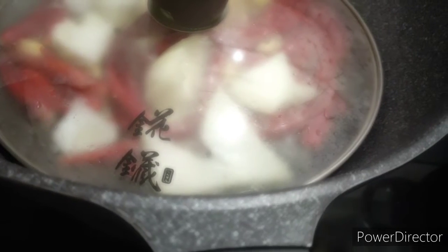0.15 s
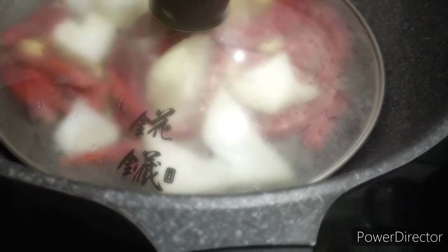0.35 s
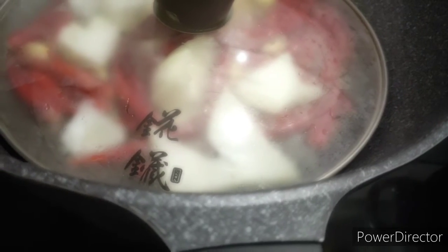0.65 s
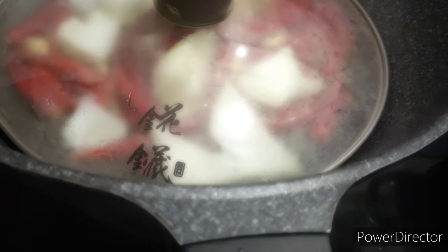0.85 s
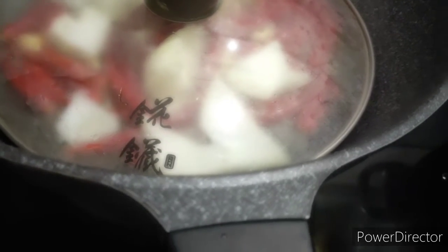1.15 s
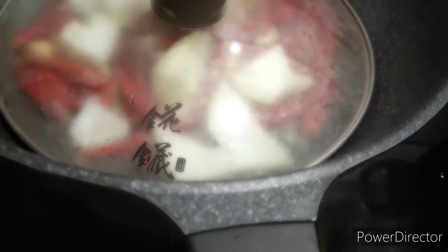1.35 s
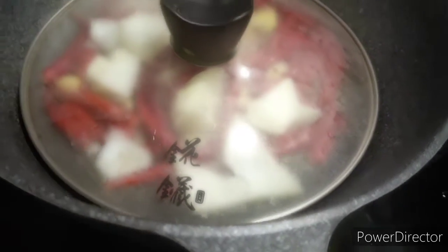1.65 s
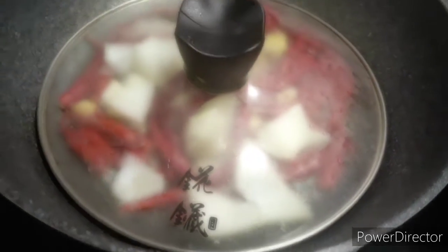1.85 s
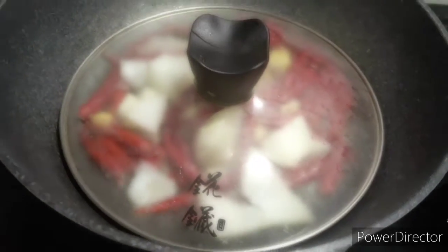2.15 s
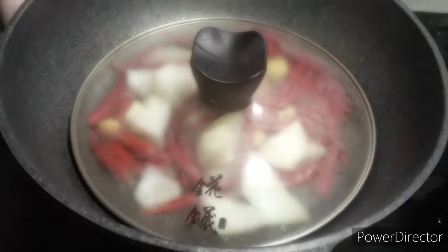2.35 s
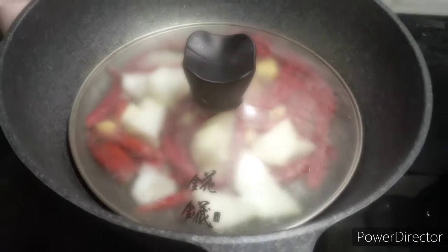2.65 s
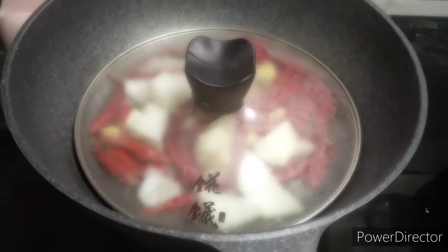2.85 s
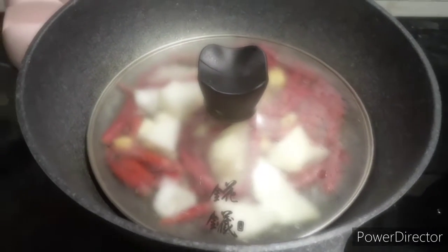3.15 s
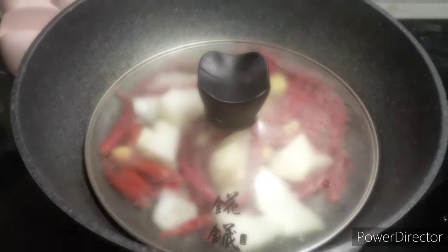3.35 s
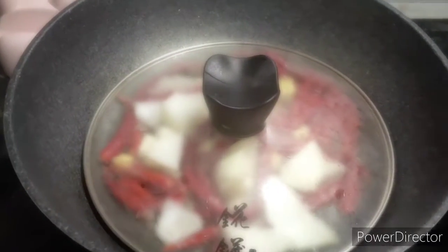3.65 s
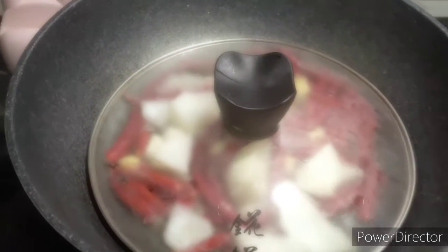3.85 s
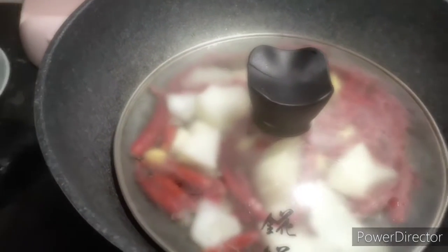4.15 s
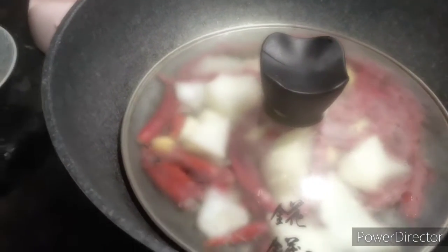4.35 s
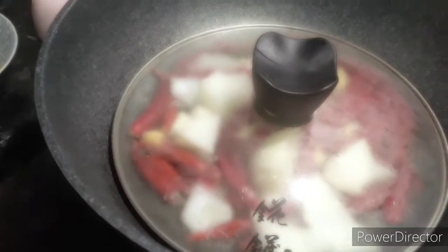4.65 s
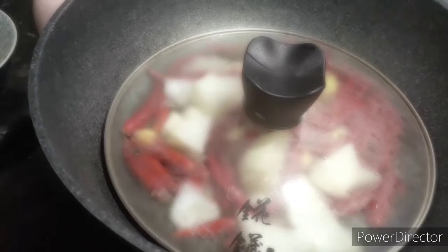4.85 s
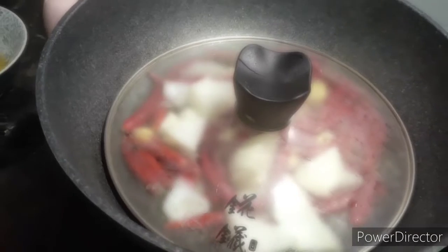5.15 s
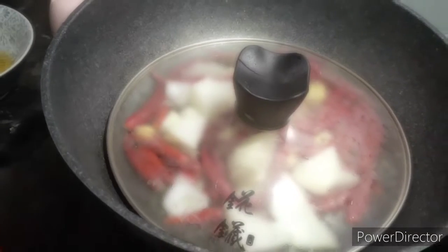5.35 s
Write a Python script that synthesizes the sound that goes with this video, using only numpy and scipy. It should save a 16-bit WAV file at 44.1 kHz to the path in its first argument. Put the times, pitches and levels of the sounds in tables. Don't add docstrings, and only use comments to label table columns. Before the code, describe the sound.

Chilies and onion fry under a glass lid in a deep pan, heard very close. Dense bubbling and airy hiss run throughout, with hollow pops and sharp spits scattered irregularly. At about 0.1 seconds a droplet thumps the right microphone and the sound dips briefly; softer knocks follow near 0.5 and 1.9 seconds. A fan hums faintly beneath.

```python
import sys
import numpy as np
from scipy import signal
from scipy.fft import rfft, irfft
from scipy.io import wavfile
from scipy.ndimage import uniform_filter1d

SR = 44100
rng = np.random.default_rng(int(sys.argv[2]) if len(sys.argv) > 2 else 0)


def dump_mix(stems):
    frames = np.atleast_2d(stems).T
    limited = np.clip(frames, -1, 1)
    pcm = np.round(limited * 32767).astype(np.int16)
    wavfile.write(sys.argv[1], SR, pcm)


def volts_from_decibels(level):
    exponent = np.asarray(level, float) / 20
    return 10 ** exponent


N = 242858
SIZE = 4096
TOP_HZ = 15780

# (time [s], peak level [dB], push time constant [s], wobble level [dB])
DROPS = [
    (0.1147, -6, 0.00092, -33),
    (0.485, -26.5, 0.0016, -44.5),
    (.639, -33.5, 0.0017, -49),
    (1.899, -20, 0.0011, -40),
]
# (frequency [Hz], width [Hz], level [dB])
BOWL = [
    [(385, 170, -47), (438.4, 236, 6), (540, 240, -0.5), (446, 25, 3)],
    [(992, 109, 12), (1133, 99, 3.5), (1236, 81, -2.5), (1085, 170, -6), (958, 45, 6.5)],
    [(1553, 263, 6.5), (1915, 128, 1.5), (2137, 204, 3), (2820, 220, -4.5), (3243, 150, -9)],
]
LIKENESS = 0.84, 0.48, 0.2


def curve(table, column):
    rows = np.array(table)
    return np.interp(np.arange(N) / SR, rows[:, 0], rows[:, column])


def shape(points, size):
    hz, db = np.transpose(points)
    return np.interp(np.log(np.fft.rfftfreq(size, 1 / SR) + 1), np.log(hz), db)


def modes(table, size):
    f = np.fft.rfftfreq(size, 1 / SR) + 1e-3
    return sum(volts_from_decibels(db) / (1 + 1j * hz / width * (f / hz - hz / f)) for hz, width, db in table)


def through(x, response, size):
    return irfft(rfft(x, size) * response, size)


def unit(x):
    return x / np.sqrt(np.mean(x ** 2))


def above(hz, size):
    return 1 / (1 + (hz / (np.fft.rfftfreq(size, 1 / SR) + 1)) ** 12)


def pair(shape_of, likeness):
    mid, side = rng.standard_normal(shape_of + (2,)).T
    c = np.clip(likeness, 0, 1)
    common = np.sqrt(1 + c) * mid
    opposed = np.sqrt(1 - c) * side
    return np.array([common + opposed, common - opposed])


def grains(rate, spread_db, smear_s):
    loudness_db = spread_db * np.minimum(rng.exponential(size=N), 3.5)
    hits = (rng.random(N) < rate / SR) * volts_from_decibels(2 * loudness_db)
    power = signal.lfilter([1], [1, -np.exp(-1 / (smear_s * SR))], hits)
    return np.sqrt(power + 1e-9)


def columns(table, **shared):
    return np.vstack([np.transpose(table)] + [np.full(len(table), v) for v in shared.values()])


def place(sounds, times, db, pan_db):
    out = np.zeros((2, N + SIZE))
    peak = np.abs(sounds).max(axis=2) + 1e-12
    for k, s in enumerate(times):
        i = max(int(s * SR), 0)
        gain = volts_from_decibels(db[k] + np.array([pan_db[k], -pan_db[k]]) / 2) / peak[:, k]
        out[:, i:i + SIZE] += sounds[:, k] * gain[:, None]
    return out[:, :N]


def bowl(table, size, struck=False):
    f = np.fft.rfftfreq(size, 1 / SR)
    ring = 0
    for k, (hz, width, db) in enumerate(table):
        if struck:
            mode = modes([(hz, 0.61 * width, 0)], size)
        else:
            mode = modes([(hz, width, 0)], size) ** 2
        ring = ring + (-1) ** k * volts_from_decibels(db) * mode
    bass_cut = signal.butter(2 if struck else 4, 316, "high", fs=SR, output="sos")
    return ring * signal.sosfreqz(bass_cut, f, fs=SR)[1]


def rim(size):
    # (frequency [Hz], level [dB per Hz])
    hiss = [(1530, 19), (2600, -2), (2790, 0), (2990, -1), (3300, 0.5), (4100, -5.5), (4390, -4), (5790, 0),
            (7420, 3), (9640, -8.5), (14800, -20), (15700, -9), (16400, -71)]
    # (frequency [Hz], level [dB])
    port_tilt = [(2500, -2.5), (4400, 1.5), (8100, -2.5), (15000, -19.5)]
    echo_gain, echo_s, echo_top_hz = 0.31, .001825, 8000
    f = np.fft.rfftfreq(size, 1 / SR)
    tilt = shape(port_tilt, size) / 2
    echo = echo_gain / (1 + (f / echo_top_hz) ** 6) * np.exp(-2j * np.pi * f * echo_s)
    return volts_from_decibels(shape(hiss, size) + np.array([tilt, -tilt])) / (1 - echo)


def kitchen():
    # (frequency [Hz], level [dB per Hz])
    rumble_shape = [(12, -35), (20, 8), (59, -3), (114, 6), (144, -11), (173, -45), (217, -42), (260, -65),
                    (340, -61), (570, -120)]
    # (frequency [Hz], width [Hz], level [dB])
    fan_lines = [(102.8, 14, -78.5), (124, 0.33, -68.5), (115, 16, -71.5)]
    out = unit(through(pair((N,), 0.89), volts_from_decibels(shape(rumble_shape, N)), N)) * volts_from_decibels(-68.5)
    for hz, width, db in fan_lines:
        out = out + volts_from_decibels(db) * unit(through(pair((N,), 0.87), modes([(hz, width, 0)], N), N))
    return out


def sizzle():
    # (time [s], level [dB])
    liveliness = [(0, -44), (.3, -48.5), (.5, -44.5), (.81, -48), (1.13, -44), (1.38, -42.5), (1.6, -45.5),
                  (1.92, -47), (2.28, -44), (2.85, -45.5), (3.24, -46.5), (3.48, -47.5), (3.86, -44),
                  (4.22, -44), (4.56, -47.5), (4.95, -47.5), (5.51, -45)]
    edges_hz = 2300, 5000, 9500, 17000
    bubbling = unit(grains(200, 11.7, 0.0034)) + 0.83
    bubbles = sum(through(bubbling * pair((N,), c), bowl(m, N), N) for m, c in zip(BOWL, LIKENESS))
    bubbles = bubbles * volts_from_decibels(np.array([[1.1], [-1.1]]))

    broad = unit(grains(90, 1.8, 0.00076)) + 0.54 * bubbling
    fizz = 0
    for lo, hi in zip(edges_hz, edges_hz[1:]):
        narrow = unit(grains(68, 4.8, 0.0042))
        spray = 0.3 * broad + 0.76 * narrow + 0.5
        band = np.sqrt(above(lo, N) - above(hi, N))
        fizz = fizz + through(spray * pair((N,), 0), rim(N) * band, N)
    level_db = curve(liveliness, 1)
    return unit(bubbles) * volts_from_decibels(level_db + 1.5) + unit(fizz) * volts_from_decibels(level_db + 1.77)


def spits():
    # (time [s], peak level [dB], top octave relative level [dB], jet relative to crack [dB])
    big_spits = [(.0164, -12.5, -8.5, -28), (.1138, -20, -9, -5), (.4377, -20.5, -14, -13),
                 (.4841, -16, -10.5, 14), (.5751, -17, -9.5, -29), (.6402, -21, -7, -11),
                 (.9466, -16, -15, -4), (1.2278, -21.5, -2.5, -33), (1.253, -17, -14, 7),
                 (1.3422, -22.5, -8, -25), (1.4046, -20.5, -11, -12), (1.4328, -17, -8.5, 3),
                 (1.5408, -20.5, -27, -6), (1.6658, -9.5, -13.5, -22), (1.7866, -19.5, -31, -10),
                 (1.8976, -17.5, -10.5, -10), (1.9846, -18, -15, -8), (2.0561, -22.5, -3.5, -20),
                 (2.2266, -17.5, -14, -21), (2.4755, -25, -26, -5), (2.5558, -22, -10.5, -18),
                 (2.672, -17.5, -10, 6), (2.8816, -19.5, -16, -4), (3.237, -25, -3, 1),
                 (3.54, -19, -41, -14), (3.9641, -25, -6, -6), (4.014, -16, -3.5, -33),
                 (4.0782, -22, -5, -7), (5.1392, -25.5, -15, 3.5), (5.1415, -21.5, -4.5, -19)]
    # (time [s], peak level [dB])
    fine_spits = [(.0846, -25.5), (.1414, -23.5), (.2877, -25.5), (.3863, -30), (.5581, -23), (.721, -25),
                  (.7823, -25), (.8905, -35), (1.1218, -26.5), (2.1471, -25.5), (2.3126, -30.5),
                  (2.355, -23.5), (2.39, -22), (2.5197, -31), (2.7783, -25.5), (2.8352, -29), (3.046, -30),
                  (3.0939, -32), (3.36, -22.5), (3.4101, -31.5), (3.7509, -22.5), (3.8694, -28.5),
                  (4.0573, -26), (4.218, -27.5), (4.3494, -28), (4.5455, -33), (4.5637, -26.5),
                  (4.7646, -29), (4.8182, -23), (5.3652, -28.5)]
    # (time [s], peak level [dB])
    dull_spits = [(1.202, -26), (1.7624, -34), (1.851, -25), (1.9328, -24.5), (2.4418, -29), (2.5448, -35),
                  (3.461, -27), (3.5798, -30), (3.7896, -23.5), (4.13, -26), (4.4218, -23.5), (4.6174, -34),
                  (4.634, -30.5), (4.9133, -30), (5.4281, -30.5)]
    s, db, top_db, jet_db, pan_db = np.hstack([
        columns(big_spits, pan_db=-5.5),
        columns(fine_spits, top_db=-6.5, jet_db=-15.5, pan_db=-5.5),
        columns(dull_spits, top_db=-27, jet_db=-15.5, pan_db=-3)])
    pan_db = pan_db - rng.standard_normal(len(s))

    t = np.arange(SIZE)[None] / SR
    ragged = volts_from_decibels(5.1 * np.repeat(rng.standard_normal((len(s), SIZE // 32)), 32, axis=1))
    crack = np.minimum(t / .0012, 1) ** 2 * np.exp(-t / 0.00052)
    tail = volts_from_decibels(-4) * np.exp(-np.log(1000) * t / 0.12)
    jet = volts_from_decibels(jet_db[:, None]) * (np.exp(-t / 0.0025) * ragged + tail)
    push = (crack + jet) * pair((SIZE, len(s)), 0.011)

    top = above(10000, SIZE)
    colour = rim(SIZE)[:, None] * above(2250, SIZE) * (volts_from_decibels(-5.5) + above(4500, SIZE))
    body = place(through(push, colour * (1 - top), SIZE), s, db, pan_db)
    treble = place(through(push, colour * top, SIZE), s, db + top_db + 1.5, pan_db + 0.5)
    return body + treble


def pops():
    # (time [s], peak level [dB], lowest mode relative [dB], upper modes relative [dB])
    big_pops = [(.004, -27, -10.5, -8), (0.019, -31.5, -24, 2.5), (.06, -34, 6.5, -5),
                (0.408, -23.5, -9.5, -4.5), (.422, -28.5, 1.5, -9), (.486, -22, -16, -6.5),
                (0.512, -30, -3, -4.5), (.547, -31, -8, -3), (0.739, -26.5, -9.5, -12.5),
                (.937, -24.5, -4, -21), (.945, -30, 2.5, 9), (1.203, -30, -35, 9),
                (1.208, -21.5, -1.5, -29), (1.539, -32.5, -4, 4.5), (1.559, -22.5, -6.5, -22),
                (1.581, -24, -10, -5.5), (1.664, -27.5, -4, 1), (1.982, -21.5, -6.5, -8.5),
                (2.276, -25, -7, -8.5), (2.39, -28, -4.5, -6), (2.441, -15.5, -10.5, -15),
                (2.673, -37, -20, 8), (2.88, -20, -9, -16), (3.538, -25, -8.5, 1.5),
                (4.013, -23.5, -3.5, -7.5), (4.221, -37.5, -3, -6), (4.23, -28, 0, -3.5),
                (4.453, -33, -5.5, -1.5), (5.131, -28, -4.5, 1), (5.429, -23.5, -10.5, -10.5)]
    # (time [s], peak level [dB], upper modes relative [dB])
    deep_pops = [(.059, -27.5, -18), (.07, -35, 7), (.254, -37, -5), (.274, -32, -7), (.496, -37, 8),
                 (.577, -33, -5), (.713, -44, 5.5), (.803, -39, 6), (.891, -33, -1), (1.189, -26, -5),
                 (1.306, -31, -7), (1.349, -29, -3), (1.898, -43, 6), (2.095, -28.5, -4), (2.244, -31, -6),
                 (2.459, -34, 2), (2.476, -35, -11), (2.545, -26.5, -6), (3.181, -30.5, -8),
                 (3.462, -31, -18), (3.621, -27.5, -10), (4.06, -30.5, -6.5), (4.331, -29.5, -7),
                 (4.373, -33, -8), (4.503, -30, -28), (4.617, -32.5, -21), (4.632, -28, -4),
                 (4.754, -34, -9), (4.966, -36.5, -6), (5.142, -29, -1.5)]
    # (time [s], peak level [dB], upper modes relative [dB])
    thin_pops = [(.347, -36.5, -3), (.385, -46, -12), (.439, -43, 10), (1.004, -38.5, -20), (1.47, -28, -3),
                 (1.626, -24, -27), (1.934, -33, -9), (2.145, -32, -2), (2.172, -32, -11),
                 (2.759, -38.5, 1.5), (2.946, -30, -7.5), (3.238, -32, 2), (3.431, -27, -34),
                 (3.81, -27.5, -12), (3.835, -24, -30), (3.914, -30.5, -3), (3.959, -29.5, -5),
                 (4.161, -41, -8), (4.29, -29.5, -31), (4.592, -30.5, -12), (4.865, -37.5, -28),
                 (4.935, -40, -23), (5.186, -29.5, -10), (5.26, -30, -9), (5.365, -28.5, -7.5)]
    small = np.hstack([columns(deep_pops, low_db=-8), columns(thin_pops, low_db=-13)])
    small = small[[0, 1, 3, 2]]
    s, db, low_db, high_db = np.hstack([np.transpose(big_pops), small])
    pan_db = 1.9 - rng.standard_normal(len(s))

    t = np.arange(SIZE)[None] / SR
    lag = .0001 * rng.standard_normal((len(s), 1))
    burst = np.array([np.exp(-((t - .0015 - side * lag) / .00009) ** 2) for side in (1, -1)])
    rattle = volts_from_decibels(-4) * np.exp(-np.log(1000) * t / 0.18)
    shove = np.minimum(t / 0.00031, 1) * np.exp(-t / 0.0013) + rattle

    out = 0
    levels = (db + low_db + 0.5, db - 2.0, db + high_db + 6.5)
    for group, c, level in zip(BOWL, LIKENESS, levels):
        push = -volts_from_decibels(12.5) * burst + shove * pair((SIZE, len(s)), c)
        out = out + place(through(push, bowl(group, SIZE, struck=True), SIZE), s, level, pan_db)
    return out


def wet_port():
    wobble_hz = 99
    jolt_db, jolt_s, swell_s, swell_spread = 15, .012, 0.089, 0.5
    t, out = np.arange(N) / SR, 0
    slow = uniform_filter1d(uniform_filter1d(rng.standard_normal(N), size=600), size=600)
    flutter = volts_from_decibels(2.0 * unit(slow))
    for s, db, tau, wobble_db in DROPS:
        since = np.maximum(t - s, 1e-6)
        jolt = volts_from_decibels(jolt_db) * np.minimum(since / 0.018, 1) * np.exp(-since / jolt_s)
        swell_peak = swell_s * volts_from_decibels(0.19 * (wobble_db + 33.5))
        swell = np.exp(-.5 * (np.log(since / swell_peak) / swell_spread) ** 2)
        push = np.tanh((t - s) / .00008) * np.exp(-np.abs(t - s) / tau)
        wobble = (jolt + swell) * flutter * np.sin(2 * np.pi * wobble_hz * (t - s))
        out = out - volts_from_decibels(db) * push + volts_from_decibels(wobble_db) * wobble
    return np.array([0 * out, out])


def duck():
    depth_db, attack_s, hold_s, release_s = -7, 0.0092, 0.117, 0.01
    since = np.arange(N) / SR - DROPS[0][0]
    fall = since / attack_s
    recovery = 1 - (since - attack_s - hold_s) / release_s
    return volts_from_decibels(depth_db * np.clip(np.minimum(fall, recovery), 0, 1))


def scene():
    return (kitchen() + sizzle() + spits() + pops()) * volts_from_decibels(0.5) * duck() + wet_port()


def starve(x):
    f, _, z = signal.stft(x, SR, nperseg=1024, noverlap=512)
    starts = np.arange(0, len(f), 5)
    power = np.add.reduceat((np.abs(z) ** 2).sum(0), starts)
    db = 10 * np.log10(uniform_filter1d(power, size=3) + 1e-18)
    attack_db = np.clip(np.roll(db, -2, axis=1) - db - 6, 0, 20)
    chance = np.repeat(rng.standard_normal(db.shape), 3, axis=1)[:, :db.shape[1]]
    weak = db - uniform_filter1d(db, size=13, axis=0) + 3.5 * chance - .55 * attack_db
    margin_db = np.interp(f[starts], [2100, 2600, 4300, 5500, 7000, 9000, 15000],
                          [-20, -3, -4, -1.5, -9, -4, -3.5])
    keep = np.repeat(weak > margin_db[:, None], 5, axis=0)[:len(f)]
    bright_db = db[f[starts] > 12000].max(axis=0)
    rise_db = bright_db - np.roll(bright_db, 2)
    leak = volts_from_decibels(-6) * (rise_db > np.percentile(rise_db, 94))
    edge_hz = TOP_HZ - 250 - 300 * np.abs(chance[0])
    keep = keep * np.where(f[:, None] < edge_hz, 1, leak)
    return signal.istft(z * keep, SR, nperseg=1024, noverlap=512)[1][:, :N]


def band_limit(x):
    return signal.sosfilt(signal.butter(12, 16640, fs=SR, output="sos"), x)


def record(dry):
    top_cut = signal.ellip(4, .5, 16, TOP_HZ, fs=SR, output="sos")
    mix = starve(signal.sosfilt(top_cut, dry))
    return band_limit(mix)


dry = scene()
out = record(dry)
dump_mix(out)
```